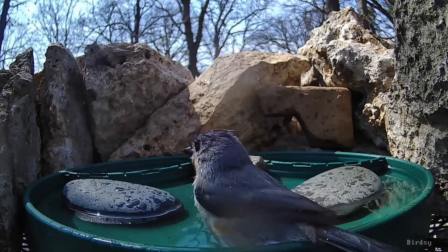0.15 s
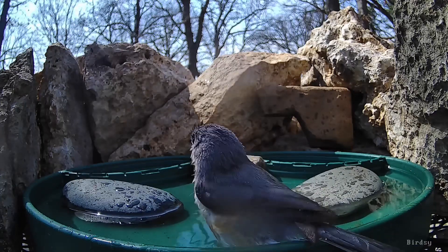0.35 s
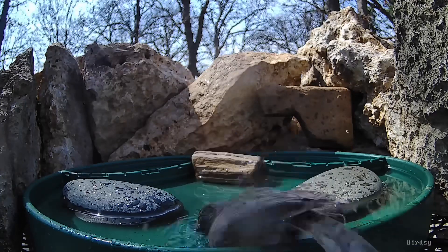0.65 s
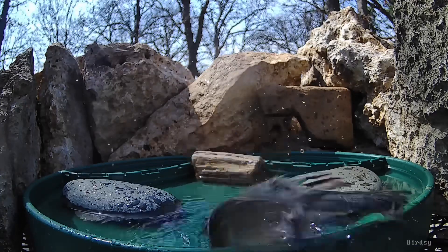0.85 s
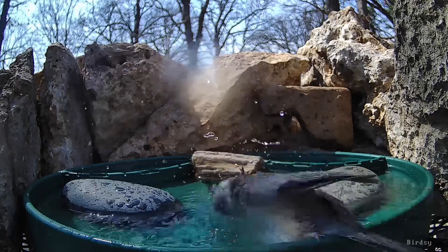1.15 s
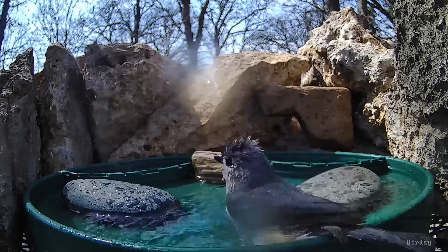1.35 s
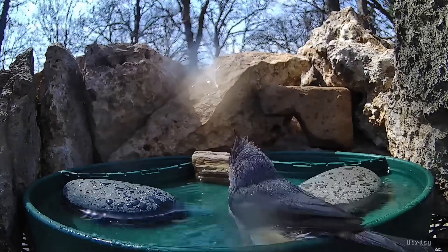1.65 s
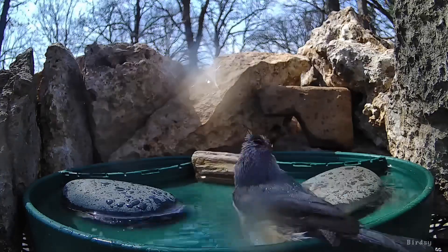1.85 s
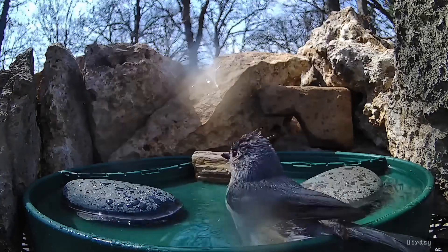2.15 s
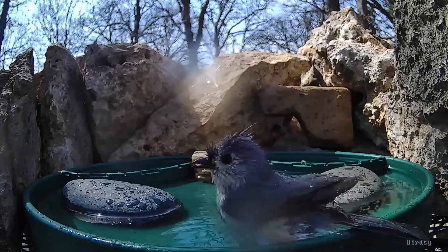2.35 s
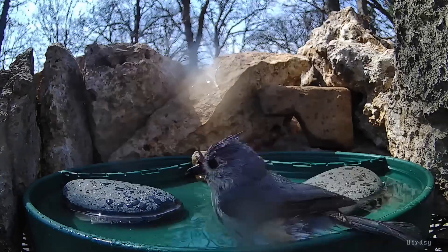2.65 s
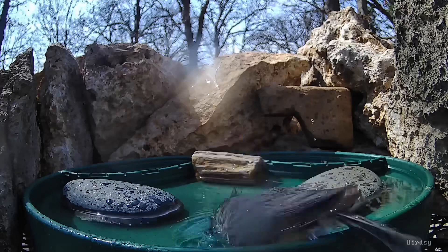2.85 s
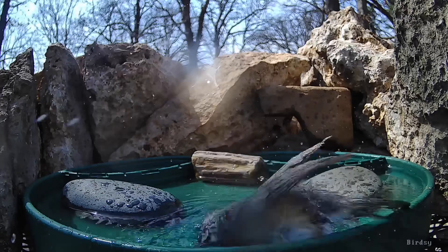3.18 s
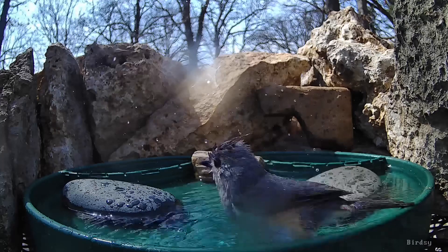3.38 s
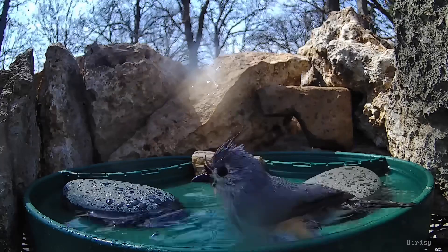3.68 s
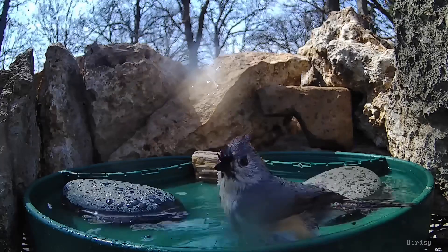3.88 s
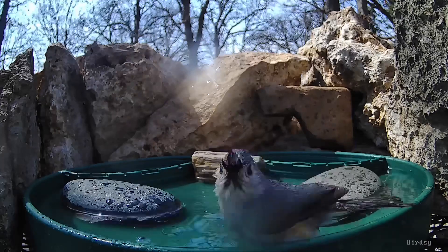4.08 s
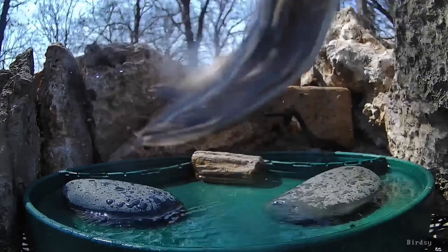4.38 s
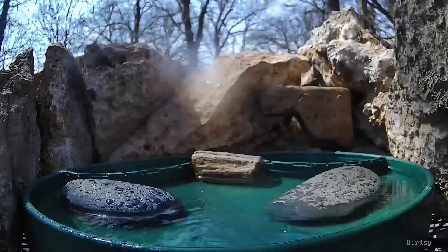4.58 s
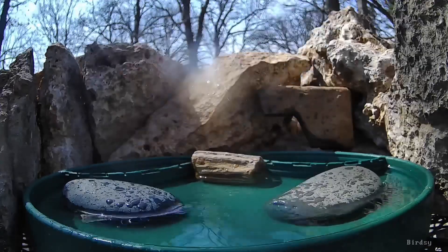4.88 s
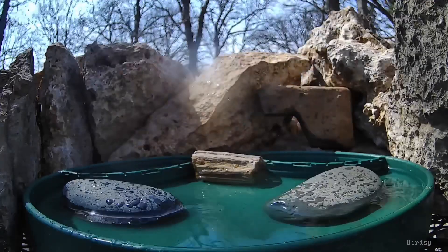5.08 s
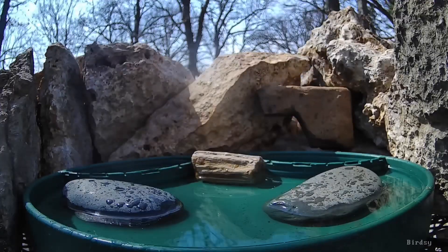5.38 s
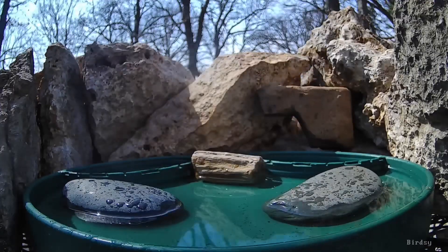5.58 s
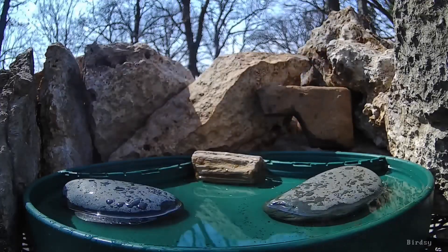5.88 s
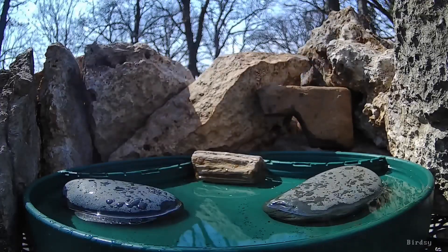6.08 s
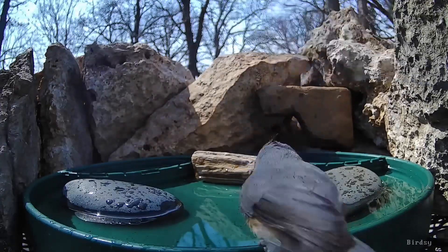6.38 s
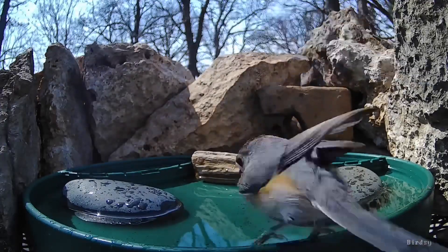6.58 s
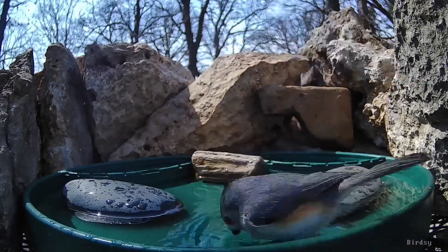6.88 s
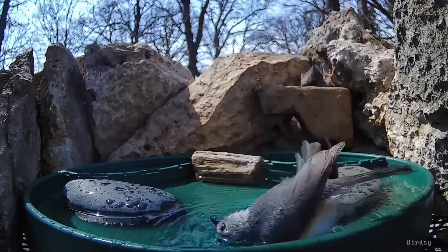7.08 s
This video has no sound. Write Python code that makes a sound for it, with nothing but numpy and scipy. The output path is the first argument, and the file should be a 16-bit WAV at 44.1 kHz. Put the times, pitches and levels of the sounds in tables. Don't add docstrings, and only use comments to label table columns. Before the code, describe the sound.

In a quiet yard with far traffic rumble, faint chirps and soft hiss, a small bird bathes twice in a shallow plastic basin with quick wet slaps, bubbles and spray. It flies up onto the camera: low wing thumps and loud, sharp claw ticks and scrapes right at the microphone. It lifts off again, lands on the hollow rim with a knock, and lightly splashes.

```python
import sys
import numpy as np
from scipy import signal
from scipy.fft import rfft, irfft, next_fast_len
from scipy.io import wavfile
from scipy.ndimage import map_coordinates

SR = 44100
rng = np.random.default_rng(int(sys.argv[2]) if len(sys.argv) > 2 else 0)


def log_audio(samples):
    frames = np.atleast_2d(samples).T
    limited = np.clip(frames, -1, 1)
    pcm = np.round(limited * 32767).astype(np.int16)
    wavfile.write(sys.argv[1], SR, pcm)


def voltage_ratio(level):
    return 10 ** (np.asarray(level, float) / 20)


N = 318843


def unit(x):
    return x / np.sqrt(np.mean(x ** 2) + 1e-20)


def curves(rows, rest=None):
    s, *cols = np.transpose(rows)
    return [np.interp(np.arange(N) / SR, s, c, left=rest, right=rest) for c in cols]


def wobble(rate):
    knots = rng.standard_normal(int(N * rate / SR) + 4)
    return map_coordinates(knots, [np.arange(N) * rate / SR])


def filtered(x, response):
    m = next_fast_len(N + SR // 4)
    return irfft(rfft(x, m) * response(np.fft.rfftfreq(m, 1 / SR)), m)[:N]


def noise(spectrum):
    f, db = np.transpose(spectrum)
    white = rng.standard_normal(N)
    return unit(filtered(white, lambda hz: voltage_ratio(np.interp(np.log(hz + 1), np.log(f + 1), db))))


def resonant(x, modes):
    def response(f):
        total = 0
        for k, (centre, width, db) in enumerate(modes):
            loss = 1j * f * width
            total = total + (-1) ** k * voltage_ratio(db) * (loss / (centre * centre - f * f + loss)) ** 2
        return total
    return filtered(x, response)


def bursts(times, levels_db, lengths_ms, rise_ms, lead=0, lead_ms=3):
    out, t = np.zeros(N + 8000), np.arange(4000) / SR * 1000
    for s, db, ms, rise in np.broadcast(times, levels_db, np.abs(lengths_ms), np.abs(rise_ms)):
        before = lead * np.exp(-t[::-1] / lead_ms)
        after = (1 + rise / ms) * (1 - (1 - lead) * np.exp(-t / rise)) * np.exp(-t / ms)
        out[round(s * SR):][:8000] += voltage_ratio(db) * np.r_[before, after]
    return out[4000:N + 4000]


def swells(rows):
    out, t = np.zeros(N), np.arange(-80, 80, 1000 / SR)
    for s, db, ms in rows:
        add(out, s - .08, voltage_ratio(db) * np.exp(-(t / ms) ** 2))
    return out


def gated(spans):
    edge_s, edge_db = 0.097, -15.5
    out = np.zeros(N)
    for a, b, db0, db1 in spans:
        path = [(a - edge_s, db0 + edge_db), (a, db0), (b, db1), (b + edge_s, db1 + edge_db)]
        out += voltage_ratio(curves(path, rest=-150)[0])
    return out


def add(out, s, sound):
    part = out[round(s * SR):][:len(sound)]
    part += sound[:len(part)]


def grit(rate, spread_db):
    chance, sign, size = rng.random((3, N))
    return unit((chance < rate / SR) * np.sign(sign - .5) * voltage_ratio(spread_db * size))


# f/Hz, level/dB per Hz
HISS = [(1180, -52), (2000, -23), (2710, -5), (2850, -10), (3130, -7.5), (4240, -5), (13400, -6),
        (15000, -20)]


def hiss():
    return voltage_ratio(-76 + 0.083 * wobble(1.8)) * noise(HISS)


# t/s, rumble rise/dB
SHAKES = [
    (1.17, 3.5),
    (3.3, 2.5),
    (4.7, 4),
    (5.95, 4),
]


def shake_rise_db():
    t = np.arange(N) / SR
    return sum(db * np.exp(-((t - s) / 0.22) ** 2) for s, db in SHAKES)


# t/s, tyre level/dB
CAR = [(0, -64.5), (1.3, -66), (2, -66.5), (3.9, -68.5), (5.4, -67.5), (6.0, -60), (6.38, -63), (6.75, -59),
       (7.23, -59.5)]
# f/Hz, level/dB per Hz
RUMBLE = [(4.7, -46), (8.0, -1), (43, 2), (68, 1.5), (100, -3.5), (200, -27.5), (260, -43), (440, -120)]
# f/Hz, level/dB per Hz
TYRES = [(350, -45), (600, -9), (950, 1), (1400, -2.5), (2000, -11), (2800, -17.5), (4000, -22.5),
         (6000, -58)]


def far_car(shake_db):
    tyres_db, = curves(CAR)
    follow = 0.37
    rumble_db = -50.5 + follow * (tyres_db + 66) + shake_db + 0.25 * wobble(3.8)
    rumble = voltage_ratio(rumble_db) * noise(RUMBLE)
    return rumble + voltage_ratio(tyres_db + 1.3 * wobble(4.2)) * noise(TYRES)


# t/s, level/dB
LORRY = [(0, -62), (2.0, -60), (3.1, -60.5), (3.7, -62), (6.3, -64), (6.8, -60), (7.23, -58)]
# f/Hz, level/dB per Hz
ENGINES = [(76, -13), (130, -1), (216, -1.5), (247, -8.5), (323, -6), (404, -11), (910, -14), (1540, -120)]


def far_engines(shake_db):
    level_db, = curves(LORRY)
    return voltage_ratio(level_db + 0.34 * shake_db + 0.85 * wobble(6)) * noise(ENGINES)


# start t/s, end t/s, f/Hz, level/dB
DRONE = [(1.6, 3.4, 220, -69), (3.9, 5, 222, -67), (2.7, 4.7, 331, -69), (4.75, 5.5, 331, -66),
         (1.8, 2.8, 512, -72), (2.2, 2.85, 470, -71), (2.25, 2.8, 311, -69), (6.2, 7.3, 100, -55),
         (6.5, 7.3, 190, -66)]


def drone():
    out, swell, drift = np.zeros(N), voltage_ratio(1.1 * wobble(4.3)), 1.6 * wobble(6.93)
    for start, end, hz, db in DRONE:
        t = np.arange(round((end - start) * SR)) / SR
        note = np.sin(2 * np.pi * hz * t + drift[:len(t)])
        add(out, start, voltage_ratio(db) * signal.windows.tukey(len(t), .4) * note)
    return out * swell


def yard():
    shake_db = shake_rise_db()
    return far_car(shake_db) + far_engines(shake_db) + drone() + hiss()


# t/s, length/s, start f/Hz, end f/Hz, level/dB
CHIRPS = [(.273, .034, 3420, 2960, -71), (.305, .03, 3220, 3700, -78), (.49, .025, 3200, 3400, -85),
          (0.6, 0.05, 3180, 3570, -80), (.64, .06, 3560, 3450, -83), (.73, 0.046, 3550, 3000, -74),
          (.91, .025, 3330, 3500, -81), (1.957, 0.066, 3420, 3600, -73), (2.04, 0.029, 6950, 7100, -73),
          (2.25, .1, 2500, 2500, -84), (2.303, 0.027, 3500, 3420, -69), (2.33, .09, 2860, 2920, -84),
          (2.5, .1, 3660, 3650, -84), (2.642, 0.032, 3420, 3800, -68), (2.69, .045, 3880, 3860, -84),
          (2.66, .05, 2510, 2500, -85), (2.712, .035, 2490, 2490, -75), (2.76, .065, 2500, 2470, -81),
          (2.81, .045, 2880, 2960, -75), (2.83, .022, 3080, 3130, -79), (2.855, .08, 3660, 3650, -78),
          (2.883, .022, 4120, 4280, -70), (2.903, .034, 4250, 4800, -76), (2.932, 0.036, 4840, 4760, -79),
          (2.93, .025, 2500, 2500, -82), (2.98, .014, 3660, 3640, -75), (3.007, .014, 4680, 4260, -73),
          (3.01, .012, 4270, 4080, -72), (3.085, .028, 3500, 3640, -76), (3.59, .035, 2550, 2540, -79),
          (3.665, 0.032, 2570, 2530, -78), (3.72, .13, 2570, 2545, -83), (5.11, .04, 2550, 2400, -80),
          (5.205, .03, 3700, 3500, -77), (5.575, .045, 4230, 4200, -80), (6.132, 0.045, 7900, 5340, -71),
          (6.154, 0.075, 5500, 4350, -75), (6.345, 0.04, 4140, 5070, -68), (6.382, 0.041, 5550, 5720, -74),
          (6.482, 0.025, 6030, 4400, -66.5), (6.69, 0.077, 4850, 5400, -76), (6.76, .06, 5350, 5300, -85),
          (7.096, .04, 5550, 5600, -79), (7.14, .04, 5300, 4300, -81)]
# t/s, start f/Hz, level/dB
TWITTER = [(.15, 3820, -80), (.21, 2600, -83), (.343, 3420, -78), (.388, 3700, -80), (.433, 2800, -78),
           (.515, 2580, -78), (.57, 2780, -79), (.682, 2780, -85), (.815, 2600, -75), (.872, 2900, -77),
           (1.56, 3300, -80)]


def far_birds():
    out, waver = np.zeros(N), 0.0123 * wobble(300)
    short_notes = [(s, 0.034, hz, hz * .9, db) for s, hz, db in TWITTER]
    for s, length, hz0, hz2, db in CHIRPS + short_notes:
        hz1 = hz0 + .65 * (hz2 - hz0)
        u = np.linspace(0, 1, round(length * SR))
        hz = hz0 * (1 - u) * (1 - 2 * u) + 4 * hz1 * u * (1 - u) + hz2 * u * (2 * u - 1)
        rough = abs(hz2 - hz0) / 1500 * (2.5 if s > 6 else 1)
        hz = hz * (1 + waver[round(s * SR):][:len(u)] * rough)
        shape = np.sqrt(np.abs(np.sin(np.pi * u)))
        add(out, s, voltage_ratio(db) * shape * np.sin(2 * np.pi * np.cumsum(hz) / SR))
    tail = np.arange(SR // 8)
    trees = rng.standard_normal(SR // 8) * voltage_ratio(-60 * tail / SR / 0.17)
    out = out * voltage_ratio(1.5 * wobble(70) + 2 * wobble(300) + 1)
    return out + voltage_ratio(-3) * signal.fftconvolve(out, trees / np.linalg.norm(trees))[:N]


# t/s, length/s, centre f/Hz, spread/Hz, level/dB
RASPS = [(0, .025, 4100, 1300, -72), (0.066, 0.036, 4000, 1500, -67), (.11, 0.059, 4300, 800, -73),
         (2.47, .025, 3700, 600, -74), (2.857, .018, 4200, 1600, -74), (3.008, .02, 3400, 700, -69),
         (6.235, .015, 3800, 900, -71), (6.325, .015, 5000, 700, -70), (6.343, .015, 5100, 700, -62),
         (6.7, .015, 5000, 3000, -74), (6.798, .02, 3630, 900, -64)]


def rasps():
    out = np.zeros(N)
    for s, length, hz, spread_hz, db in RASPS:
        t = np.arange(round(length * SR)) / SR
        grain = map_coordinates(rng.standard_normal(200), [t * spread_hz])
        shape = np.sqrt(np.sin(np.pi * t / length))
        add(out, s, voltage_ratio(db) * shape * grain * np.sin(2 * np.pi * hz * t))
    return out


# t/s, level/dB
TIPS = [(5.363, -39.5), (5.393, -50), (5.41, -56), (5.437, -47), (5.455, -47.5), (5.493, -44.5),
        (5.529, -54)]


def feather_tips():
    colour = [(50, -9), (110, 1), (650, -0.5), (1500, -15), (3000, -22), (5000, -60)]
    return bursts(*np.transpose(TIPS), 6.8, rise_ms=1.5) * noise(colour)


# t/s, level/dB, width/ms
FAN = [
    (4.375, -70, 12),
    (4.41, -74, 4),
]


def fan():
    colour = [(9000, -40), (11000, -10), (11700, 4), (12600, -5), (13800, 0), (15000, -20)]
    return swells(FAN) * noise(colour)


# t/s, level/dB, length/ms
LANDING = [
    (3.276, -62, 3.3),
    (4.372, -55.5, 17),
    (5.998, -49, 8.6),
    (6.57, -33.5, 4),
    (6.575, -41, 2.9),
    (6.578, -43.5, 16),
]
# f/Hz, width/Hz, level/dB
BASIN = [(279, 174, 9), (714, 770, -18), (1350, 390, 3), (2060, 230, 0), (2580, 640, -7)]


def landing():
    s, db, ms = np.transpose(LANDING)
    knocks = bursts(s, db + 9.5, ms, rise_ms=0.22) * grit(2800, spread_db=14)
    return resonant(knocks, BASIN)


# t/s, peak level/dB, bright share/dB, length/ms
CLAWS = [(4.5455, -30, -21, 1.7), (4.555, -18, -9, 1.2), (4.56, -23, -9, 3.4), (4.705, -31, -14, 2.3),
         (4.7609, -15, -14.5, 1.8), (4.7819, -16, -15.5, 1.8), (4.8348, -16.5, -8, 1.4),
         (4.838, -11, -5, 3.4), (4.8706, -19, -12.5, 5), (5.0597, -33.5, -10, 2.4), (5.095, -23.5, -3, 1.4),
         (5.1386, -36.5, -10, 1.4), (5.294, -39, -10, 3.6), (5.338, -25.5, 5.5, 1.9),
         (5.3622, -32.5, 4, 2.1), (5.3684, -29, -2, 1.2), (5.39, -32, -8.5, 2.3), (5.7224, -33.5, -5, 1.5),
         (5.7405, -20, -4, 1.8), (5.7695, -23.5, -9, 2.2), (5.851, -38.5, -11, 4.4),
         (5.966, -42.5, -3, 4.8)]
# t/s, peak level/dB, bright share/dB
TOUCHES = [(4.9701, -57, -10), (5.0687, -38, -8), (5.075, -42, -6), (5.118, -50, -8), (5.13, -41, -12),
           (5.146, -45, -8), (5.1584, -52, -14), (5.1711, -48, -17), (5.281, -51, -4), (5.316, -46, -6),
           (5.332, -32, 1), (5.345, -44, -5), (5.351, -41, -6), (5.71, -50, -7), (5.782, -38, -8),
           (5.89, -45, -7), (5.905, -54, -4), (5.913, -47, -22), (5.929, -46, -8), (5.938, -45, 0),
           (5.956, -50, -4)]
# start t/s, end t/s, start level/dB, end level/dB, bright share/dB
SCRAPE = [(4.551, 4.578, -62, -57, -12), (4.586, 4.647, -47, -51, -5.5), (4.648, 4.674, -54, -53, -7),
          (4.676, 4.698, -51, -47, -9), (4.7, 4.711, -47, -45, -8), (4.716, 4.745, -56, -52, -3),
          (4.745, 4.772, -48, -46, -3), (4.783, 4.825, -40, -52, -2), (4.799, 4.812, -51, -46, -1),
          (4.818, 4.87, -57, -52, 2), (4.872, 4.899, -45, -57, -1), (4.897, 4.925, -66, -74, -15),
          (4.97, 5.036, -73, -70, -3), (5.052, 5.081, -62, -62, 3), (5.084, 5.115, -59, -65, 3),
          (5.133, 5.152, -73, -71, 5), (5.289, 5.341, -57, -48, 1), (5.345, 5.368, -54, -47, 2),
          (5.687, 5.713, -74, -70, 9), (5.74, 5.791, -56, -62, -3), (5.79, 5.843, -73, -73, -6),
          (5.84, 5.862, -64, -64, 2), (5.865, 5.899, -64, -58, -3), (5.919, 5.947, -75, -66, 6)]
# f/Hz, width/Hz, level/dB
SHELL_LOW = [(3500, 1500, -17), (4320, 220, -4), (4760, 380, -12), (5780, 560, 5), (6250, 600, -0.5)]
SHELL_MID = [(7600, 390, -10), (8380, 590, -5), (9440, 670, -6.5), (10230, 600, 0)]
SHELL_HIGH = [(11070, 430, -9), (12060, 500, -6.5), (12660, 500, -9), (13500, 1100, -2)]


def claws():
    touch_ms, rise_ms = 2.5, 0.31
    s, db, bright_db, ms = np.transpose(CLAWS + [(*row, touch_ms) for row in TOUCHES])
    chatter = grit(7000, spread_db=12)
    chatter[np.round(s * SR).astype(int) + 8] = 8
    low = bursts(s, db - 6.0, 0.89 * ms, rise_ms, lead=0.018) * chatter
    high = bursts(s, db + bright_db + 7.5, 0.76 * ms, rise_ms, lead=0.032) * chatter
    rub = unit(grit(2300, spread_db=29.0) + rng.standard_normal(N)) * voltage_ratio(3.3 * wobble(160))
    bright = np.zeros(N)
    for start, end, db0, db1, share_db in SCRAPE:
        a, b = round(start * SR), round(end * SR)
        drag = voltage_ratio(np.linspace(db0, db1, b - a) + 5.0) * signal.windows.tukey(b - a, .15) * rub[a:b]
        low[a:b] += drag
        bright[a:b] += voltage_ratio(share_db) * drag
    shell = resonant(low, SHELL_LOW)
    for modes in SHELL_MID, SHELL_HIGH:
        grip = voltage_ratio(5 * wobble(60) - 1)
        shell += resonant(high + bright * grip, modes)
    return filtered(shell, lambda f: 1 / (1 + (f / 15000) ** 36))


# t/s, peak level/dB, width/ms
BEATS = [(4.4524, -25, 11.2), (4.515, -21.5, 14), (4.578, -27.5, 18), (4.791, -18.5, 15.6),
         (4.847, -29.5, 14), (5.38, -18, 14.6), (5.4237, -16.5, 13.4), (5.466, -18, 13.7),
         (5.541, -23.5, 14.6), (5.875, -35.5, 17)]


def wings():
    push, stir, t = np.zeros(N), np.zeros(N), np.arange(N) / SR
    for s, db, ms in BEATS:
        u = (t - s) * 1000 / ms
        suction = .5 * np.exp(-((u + 1.2) / .36) ** 2)
        rebound = .3 * np.exp(-((u - 1.7) / .85) ** 2)
        push += voltage_ratio(db) * (np.exp(-(u / .58) ** 2) - suction - rebound)
        stir += voltage_ratio(0.91 * db - 7.0) * np.exp(-((u + 0.43) / 2.84) ** 2)
    colour = [(40, 2), (90, 9), (250, -4.5), (700, -19.5), (1500, -30), (4000, -33.5), (6000, -83)]
    return push + stir * voltage_ratio(-24.0 + 3.6 * wobble(70)) * noise(colour)


def crowd(hz, per_s, cycles):
    slot, pitch, size = rng.random(7000), rng.standard_normal(7000), rng.exponential(size=7000)
    at = np.cumsum(2 * slot / per_s * SR).astype(int)
    pitches = np.clip(hz * np.exp(.45 * pitch), 500, 14000)
    cycle = pitches[:, None] * np.arange(200) / SR
    ring = np.exp(-cycle / cycles * 2) * np.sin(2 * np.pi * (cycle + .015 * cycle ** 2))
    drops = voltage_ratio(3 * np.minimum(size, 3))[:, None] * ring
    return unit(np.bincount((at[:, None] + np.arange(200)).ravel(), drops.ravel(), N)[:N])


# t/s, level/dB, width/ms
WASH = [(.98, -69, 12), (1.05, -71, 15), (1.11, -62, 19), (1.2, -66, 20), (1.235, -69, 10),
        (1.275, -58, 15), (1.37, -75, 18), (1.43, -66, 9.8), (3.08, -64, 12), (3.17, -65, 28),
        (3.23, -62, 9.2), (3.3, -64, 13), (3.33, -63, 18), (3.375, -63, 19), (3.43, -66, 15),
        (3.48, -72, 20), (4.378, -63.5, 17), (4.41, -64, 6.8), (4.46, -64, 28), (4.51, -66, 8.6)]


def wash():
    return swells(WASH) * crowd(hz=2150, per_s=900, cycles=4.5)


def bubble(hz, db, ms):
    u = np.arange(round(4 * ms * SR / 1000)) / (ms * SR / 1000)
    ring = np.sin(2 * np.pi * hz * ms / 1000 * (u + 0.0075 * u * u))
    return voltage_ratio(db) * (1 - np.exp(-u / 0.025)) * np.exp(-1.9 * u) * ring


# t/s, f/Hz, level/dB
BUBBLES = [(1.074, 3000, -50), (1.257, 1970, -41), (1.319, 1870, -44.5), (1.33, 1350, -48.5),
           (1.358, 2920, -50.5), (1.393, 3780, -50), (1.41, 3680, -47), (1.41, 2830, -53),
           (1.358, 1920, -55), (1.079, 2780, -52), (3.279, 3200, -44), (3.298, 3670, -58),
           (3.336, 2180, -53), (3.839, 3300, -60.5), (3.068, 1380, -51), (3.068, 1920, -53.5),
           (3.08, 1290, -50), (3.197, 3850, -56), (3.518, 3370, -50), (3.52, 3880, -51), (1.009, 4400, -49),
           (1.01, 5270, -51), (1.256, 5200, -47.5), (3.22, 1900, -51), (3.284, 1370, -43),
           (3.331, 1300, -52), (1.44, 3530, -54), (1.445, 5200, -54), (4.372, 1990, -56),
           (6.306, 1830, -47), (6.33, 3660, -54), (6.34, 292, -48)]


def bubbles():
    out = np.zeros(N)
    for s, hz, db in BUBBLES:
        add(out, s, bubble(hz, db, 9.5 * (2000 / hz) ** .8))
    return out


# f/Hz, level/dB per Hz
WET = [(1200, -11), (2200, -7), (4000, -5.5), (9000, -8), (14000, -11.5), (15200, -33)]


def wet_noise():
    return noise(WET)


# t/s, level/dB, width/ms
SHEETS = [(1.05, -68, 8), (1.378, -67, 6.7), (1.442, -65, 7), (1.992, -60, 4.2), (3.15, -71, 23),
          (3.228, -62, 7), (3.252, -50.5, 3.3), (3.376, -66, 15), (3.535, -69, 12), (4.375, -70, 11),
          (5.45, -74, 13), (5.5, -72, 8.6), (6.72, -77, 13), (6.571, -62.5, 4.3), (7.02, -76, 18),
          (7.095, -71, 10)]
# start t/s, end t/s, start level/dB, end level/dB
MIST = [
    (.96, 1.43, -69, -66),
    (3.14, 3.52, -74.5, -68.5),
    (4.41, 4.53, -67, -64.5),
    (5.43, 5.46, -70, -70.5),
    (6.3, 7.13, -77, -72),
]


def spray():
    mist = gated(MIST)
    thrown = swells(SHEETS) + mist * voltage_ratio(-5 + 3.2 * wobble(60))
    out = thrown * voltage_ratio(0.72 * wobble(280)) * wet_noise()
    for s, pitch, size in zip(np.arange(0, N / SR, .011), *rng.standard_normal((2, 700))):
        hz = 3000 * np.exp(.45 * pitch)
        add(out, s, mist[int(s * SR)] * bubble(hz, 2 + 4 * size, 11000 / hz))
    falling = swells(SHEETS[:9]) + gated(MIST[:2])
    return out + voltage_ratio(-3) * falling * crowd(hz=5200, per_s=1100, cycles=4)


# t/s, peak level/dB
SNAPS = [
    (1.0078, -35),
    (1.023, -36),
    (1.0785, -31),
    (1.2568, -23),
    (3.277, -27),
]


def snaps():
    return -bursts(*np.transpose(SNAPS), 0.15, rise_ms=0.036)


# t/s, peak level/dB, dull share/dB
FIRST_BATH = [(0.960, -45, 2), (1.0091, -39.5, -8), (1.021, -41, -4), (1.079, -42, -0.5), (1.086, -48, -8),
              (1.104, -51, 1), (1.136, -47, -4), (1.1482, -40, -2.5), (1.167, -43.5, -2.5),
              (1.195, -48, -2), (1.206, -47, 0), (1.2256, -44, 0), (1.256, -33.5, -7), (1.2636, -41, -8),
              (1.284, -44.5, -19), (1.313, -51, -6), (1.319, -41.5, -9), (1.3584, -49, -9),
              (1.4084, -57, 2), (1.433, -48, -2), (1.5548, -62, 6.5)]
SECOND_BATH = [(3.068, -68, 14.5), (3.1344, -54, -20), (3.216, -44, -6), (3.244, -39, -3.5),
               (3.281, -43, 4.5), (3.295, -54, 4), (3.3175, -57, 5), (3.366, -49, -1), (3.4215, -45, -9),
               (3.438, -50, -2), (3.5175, -51.5, 3), (3.836, -64, -1)]
# t/s, peak level/dB, dull share/dB, length/ms
SLAPS = [(2.0035, -46.5, -28, 17), (4.439, -51, -1, 11), (4.4744, -50, -11, 8), (4.503, -50.5, 5.5, 7.1),
         (4.581, -51, 5, 6.8), (5.966, -45, -8, 8), (5.987, -50, -9, 8.6), (5.998, -44, -11, 12),
         (6.009, -51, -12, 15), (6.303, -48.5, -2, 16), (6.328, -50, -10, 11), (6.349, -50.5, -1.5, 16),
         (6.8648, -43.5, -31, 22), (6.877, -39, -27, 6.5)]


def slaps():
    first_ms, second_ms = 6.6, 8.8
    first = [(*row, first_ms) for row in FIRST_BATH]
    second = [(*row, second_ms) for row in SECOND_BATH]
    s, db, dull_db, ms = np.transpose(first + second + SLAPS)
    burst = bursts(s, db - 9, 0.41 * ms, rise_ms=0.068 * ms, lead=0.22, lead_ms=2.1)
    burst = burst * voltage_ratio(2.3 * wobble(450)) * wet_noise()
    colour = [(60, -33), (150, 13.0), (500, 5.0), (1800, -1.5), (3500, -5.0), (5000, -13.0), (7000, -25)]
    return burst + bursts(s, db + dull_db, 0.54 * ms, rise_ms=1.0) * noise(colour)


def scene():
    background = yard() + far_birds() + rasps()
    bird = feather_tips() + fan() + landing() + claws() + wings()
    water = wash() + bubbles() + spray() + snaps() + slaps()
    return (background + bird + water)[None]


def band_limit(x):
    return signal.sosfilt(signal.butter(12, 15190, fs=SR, output="sos"), x)


def record(dry):
    return band_limit(dry)


dry = scene()
out = record(dry)
log_audio(out)
```